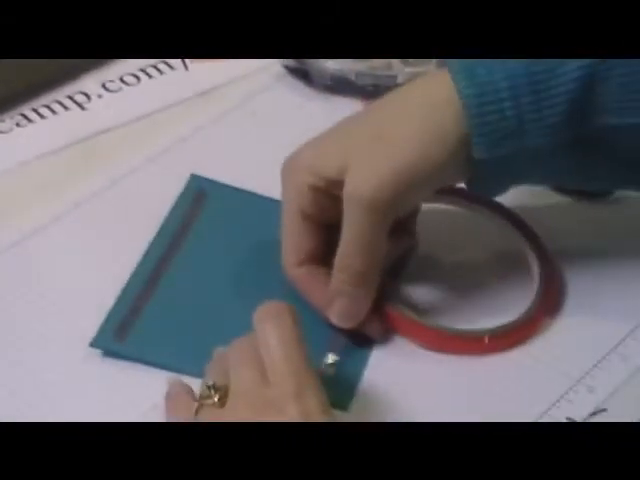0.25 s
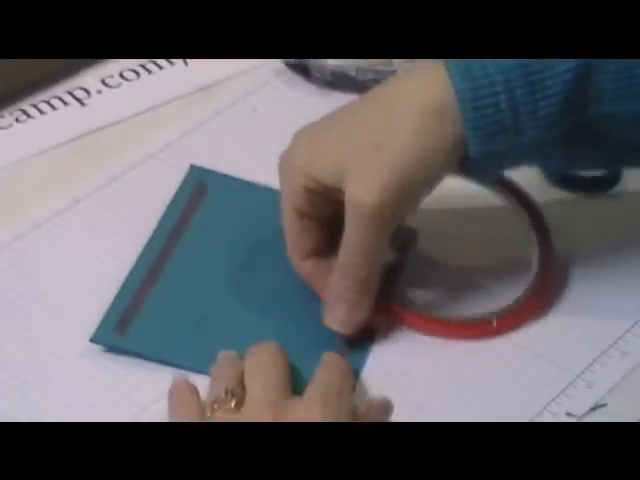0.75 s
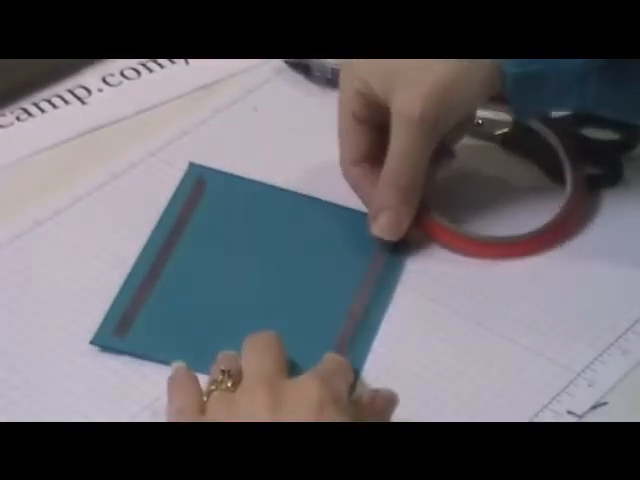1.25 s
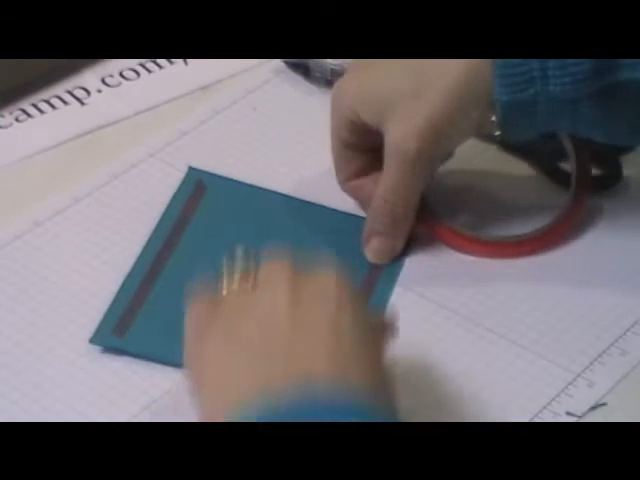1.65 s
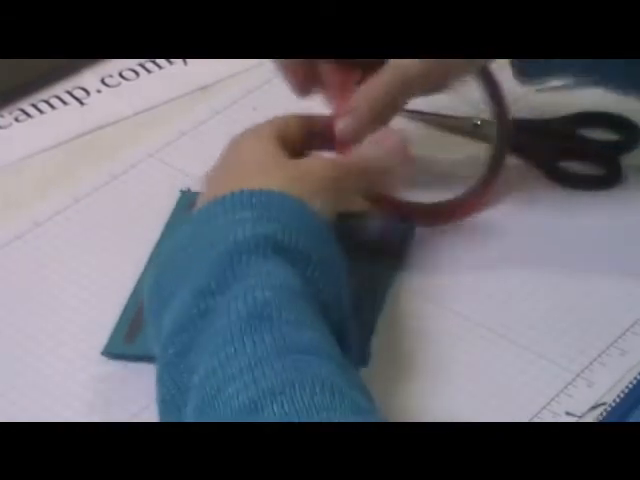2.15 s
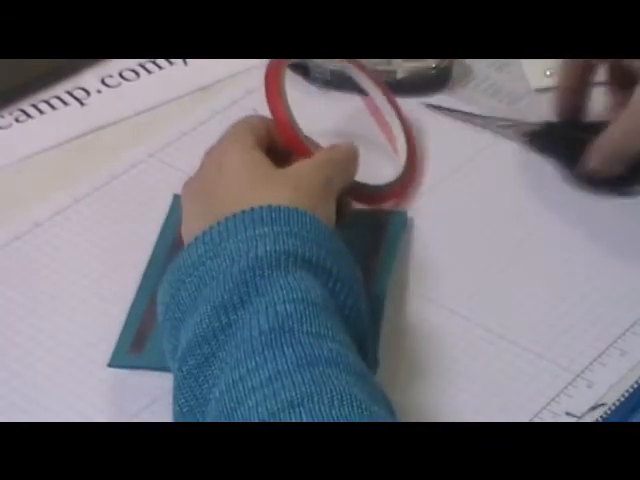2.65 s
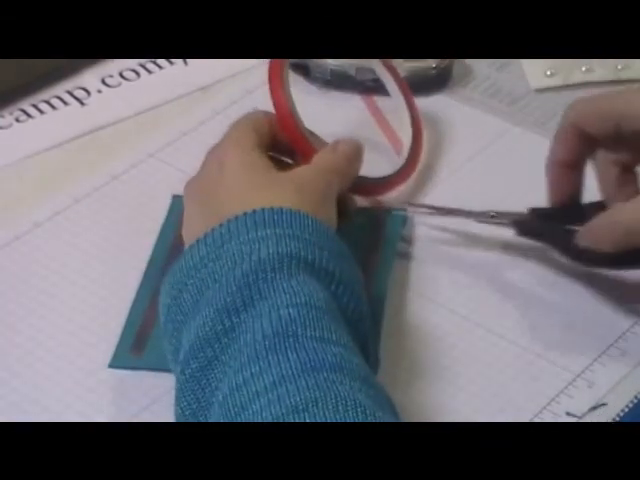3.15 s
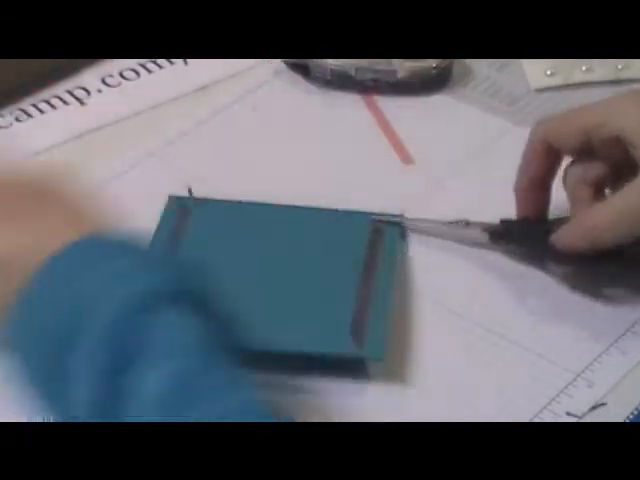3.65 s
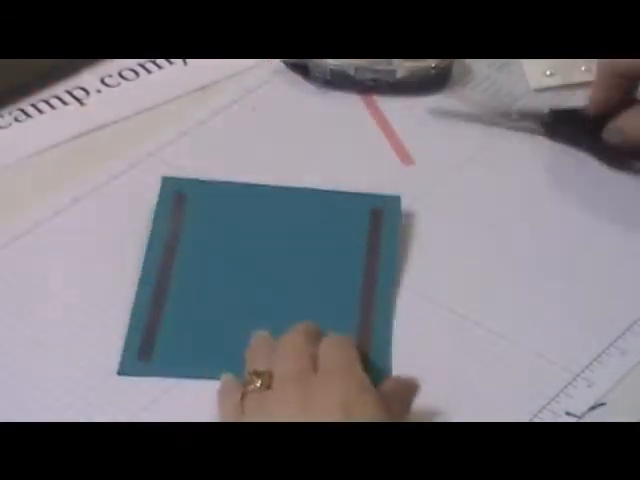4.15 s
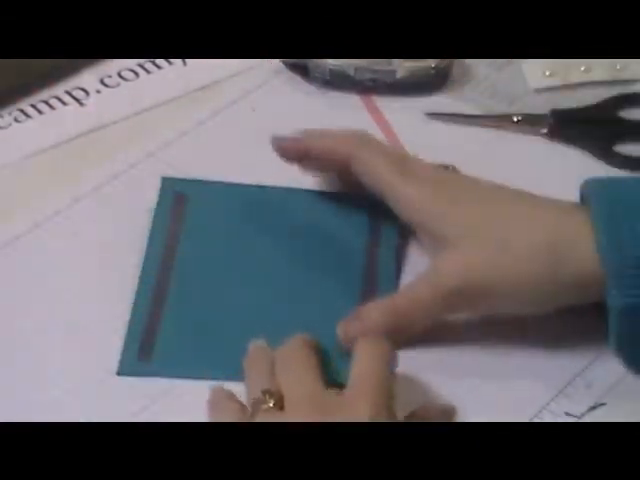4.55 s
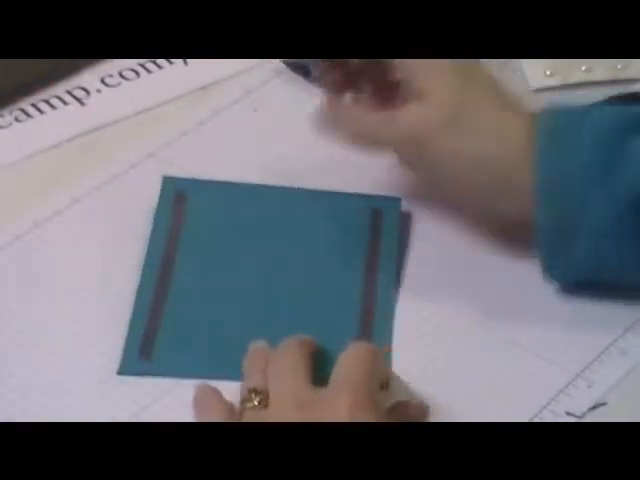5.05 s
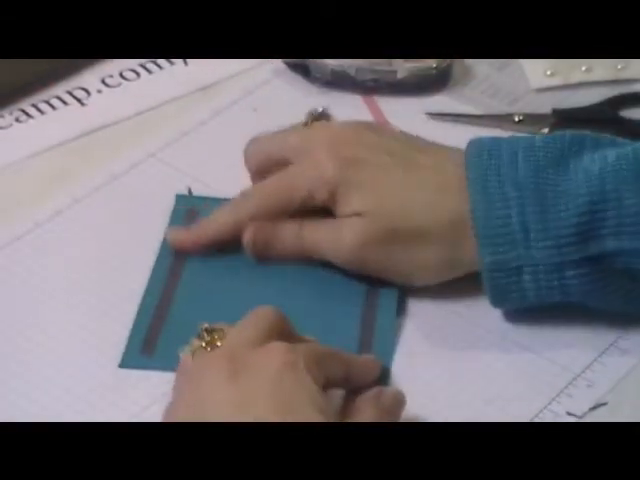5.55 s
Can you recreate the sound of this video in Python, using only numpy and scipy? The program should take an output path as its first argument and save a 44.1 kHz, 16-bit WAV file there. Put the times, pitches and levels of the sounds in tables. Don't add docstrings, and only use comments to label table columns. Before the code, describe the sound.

A tape roll knocks on a table, a strip briefly creaks, scissors snip and clatter down, then fingers rub card in a quiet room.

```python
import sys
import numpy as np
from scipy import signal
from scipy.fft import rfft, irfft
from scipy.io import wavfile
from scipy.ndimage import uniform_filter1d

SR = 44100
rng = np.random.default_rng(int(sys.argv[2]) if len(sys.argv) > 2 else 0)


def bounce(signal):
    frames = np.transpose(np.atleast_2d(signal))
    limited = np.clip(frames, -1, 1)
    pcm = np.round(limited * 32767).astype(np.int16)
    wavfile.write(sys.argv[1], SR, pcm)


def level_to_linear(level):
    exponent = np.asarray(level, float) / 20
    return 10 ** exponent


N = 255780
PORTS = np.array([[1], [-1]])


def at_hz(points, hz):
    points = np.array(points)
    return np.interp(np.log(hz), np.log(points[:, 0]), points[:, 1])


def rms_one(x):
    return x / np.sqrt(np.mean(x ** 2) + 1e-20)


def delayed(x, lag):
    return np.r_[np.zeros(lag), x[:N - lag]]


def drift(rate):
    r = np.exp(-80 * np.pi * rate / SR)
    slow = signal.lfilter([1], [1, -2 * r, r * r], rng.standard_normal(N // 40 + 2002))
    slow = slow[2000:]
    return np.interp(np.arange(N) / 40, np.arange(len(slow)), rms_one(slow))


def bands(likeness, size):
    edges_hz = np.geomspace(35, 14800, 23)
    white = rng.standard_normal((2, 2, size + 4000))
    for k, (low, high) in enumerate(zip(edges_hz, edges_hz[1:])):
        band_pass = signal.butter(2, [low, high], "band", fs=SR, output="sos")
        mid, side = signal.sosfilt(band_pass, white[k % 2])[:, 4000:]
        hz = np.sqrt(low * high)
        alike = np.clip(at_hz(likeness, hz), 0, 1)
        yield hz, np.sqrt(1 + alike) * mid + np.sqrt(1 - alike) * side * PORTS


def resonance(x, hz, width_hz):
    r, w = np.exp(-np.pi * width_hz / SR), 2 * np.pi * hz / SR
    return signal.lfilter([(1 - r * r) / 2, 0, (r * r - 1) / 2], [1, -2 * r * np.cos(w), r * r], x)


# delay/s, left level/dB, right level/dB
ECHOES = [(.0056, -11.5, -9), (.0091, -11.5, -17), (0.0144, -8.5, -9)]


def nearby(x):
    out = np.zeros((2, N))
    for delay_s, *port_db in ECHOES:
        out += level_to_linear(np.array(port_db))[:, None] * delayed(x, round(delay_s * SR))
    return out


# f/Hz, t60/s
ROOM_T60 = [(100, 0.58), (260, 0.55), (700, 0.55), (1840, 0.69), (4850, 0.4), (12000, 0.94)]
# f/Hz, level/dB
ROOM_GAIN = [(100, -11), (300, 1.56), (1000, -2), (2500, -4.5), (5000, 1.5), (12000, -9)]
# f/Hz, left-right likeness
ROOM_LIKENESS = [(100, 1), (400, 0.92), (1500, 0.51), (4000, 0.95), (12000, 0.98)]


def room(x):
    t = np.arange(SR) / SR
    swell = 1 - np.exp(-t / 0.00094)
    tail = np.zeros((2, SR))
    for hz, band in bands(ROOM_LIKENESS, size=SR):
        tail += level_to_linear(at_hz(ROOM_GAIN, hz) - 60 * t / at_hz(ROOM_T60, hz)) * band
    return signal.fftconvolve(x[None], tail * swell, axes=1)[:, :N]


# f/Hz, level/dB
FLOOR = [(32, -68), (55, -14), (87, -14), (128, -5.5), (147, -19), (181, -5.5), (1360, -18.5),
         (1710, -19.5), (2530, -25), (2840, -24.5), (13200, -36.5)]
# f/Hz, left-right likeness
FLOOR_LIKENESS = [(60, 0.46), (130, 0.11), (290, 0.044), (630, 0.053), (1370, 0.54), (3000, 0.69),
                  (6570, 1), (14400, 0.42)]


def room_air():
    air = sum(level_to_linear(at_hz(FLOOR, hz)) * band for hz, band in bands(FLOOR_LIKENESS, size=N))
    return level_to_linear(-64.5) * rms_one(air)


# f/Hz, level/dB rms
HUM = [(44, -77.5), (120, -76), (240, -89), (360, -81), (1679, -83)]


def hum():
    t, out = np.arange(N) / SR, np.zeros((2, N))
    for hz, level_db in HUM:
        phase = np.array([[0], [.6]]) * 2.9 * 44 / hz
        waver_db = 2.8 * drift(9.6) * (hz > 50)
        out += level_to_linear(level_db + 5.0 + waver_db) * np.sin(2 * np.pi * hz * t + phase)
    return out


def buzz():
    mains_hz, level_db, orders = 59.96, -93, range(30, 52)
    t, out = np.arange(N) / SR, np.zeros(N)
    for k, (size, turn) in zip(orders, rng.random((len(orders), 2))):
        out += level_to_linear(level_db + 10 * (size - k % 2)) * np.sin(2 * np.pi * (k * mains_hz * t + turn))
    return out


def whine():
    return level_to_linear(-91) * rms_one(resonance(rng.standard_normal(N), hz=11348, width_hz=60))


# t/s, hold/s, skin on card level/dB, paper slide level/dB, table drag level/dB
STROKES = [(0.0, 0.005, -74, -42, -39), (0.28, 0.053, -75, -71, -60.5), (0.452, 0.29, -75.5, -76.5, -89),
           (0.75, 0.06, -64, -63.5, -59.5), (0.938, 0.0073, -53, -58, -46), (1.036, 0.22, -61.5, -68, -61),
           (1.703, 0.049, -63, -52.5, -53.5), (1.852, 0.19, -59, -59.5, -54.5),
           (2.074, 0.15, -69.5, -62, -57), (2.314, 0.098, -64.5, -66, -64),
           (2.705, 0.029, -56.5, -52.5, -46), (3.377, 0.064, -74, -67, -57), (3.458, 0.015, -52, -53, -60),
           (3.555, 0.33, -66.5, -61.5, -62.5), (3.953, 0.043, -66, -63, -47),
           (4.058, 0.017, -66, -47.5, -51), (4.16, 0.083, -60.5, -72, -45), (4.26, 0.15, -83, -44, -43),
           (4.69, 0.055, -60, -64.5, -52), (4.864, 0.046, -54, -60, -56.5),
           (4.954, 0.0057, -53.5, -53.5, -49), (5.13, 0.14, -65.5, -63, -65),
           (5.503, 0.062, -51.5, -61, -51), (5.634, 0.21, -62, -62.5, -59)]


def strokes(t):
    rise_db_per_s = np.array([[173], [243], [205]])
    fall_db_per_s = np.array([[185], [95], [102]])
    shudder_db, shudder_fall_db_per_s = -5, 132
    steps = t[::64]
    power = np.zeros((4, len(steps)))
    for s, hold_s, *levels_db in STROKES:
        rising_db = rise_db_per_s * (s - steps).clip(0)
        falling_db = fall_db_per_s * (steps - s - hold_s).clip(0)
        power[:3] += level_to_linear(np.array(levels_db)[:, None] - rising_db - falling_db) ** 2
    for s, _, thud_db, *_ in PRESSES:
        falling_db = shudder_fall_db_per_s * (steps - s).clip(0)
        power[3] += (steps > s) * level_to_linear(thud_db + shudder_db - falling_db) ** 2
    return np.array([np.interp(t, steps, gain) for gain in np.sqrt(power)])


# f/Hz, level/dB per Hz
SKIN = [(2650, -11), (4500, -2), (5590, -6.5), (6510, -4), (7190, -0.5), (12600, -3), (16000, 15)]
# f/Hz, level/dB per Hz
PAPER = [(650, -58), (1100, -16), (2080, 3.5), (2540, -3), (3010, -3), (3470, -7.5), (6000, -15),
         (7800, -30), (13200, -120)]
# f/Hz, level/dB per Hz
RUMBLE = [(41, -65), (70, -25), (108, -10.5), (140, -9), (306, -1.5), (751, -7), (1020, -5), (1500, -13.5),
          (1950, -57), (3300, -120)]
# f/Hz, left-right likeness
RUB_LIKENESS = [(100, 0.88), (1000, 0.75), (4000, 0.99), (12000, 0.96)]
# t/s, length/s, skin level/dB, paper level/dB
SCUFFS = [(0.202, 0.085, -63.5, -75.5), (0.738, 0.094, -58, -79), (1.05, 0.07, -59, -59),
          (1.662, 0.055, -62, -52), (1.767, 0.068, -57.5, -58), (2.048, 0.14, -59, -64),
          (2.23, 0.065, -62, -73), (2.341, 0.027, -55.5, -92), (2.555, 0.12, -61.5, -50.5),
          (3.042, 0.018, -64.5, -92), (3.297, 0.048, -60.5, -76), (3.327, 0.042, -53.5, -59),
          (3.38, 0.04, -66, -72), (3.417, 0.016, -50.5, -57), (3.45, 0.008, -48, -65),
          (3.4575, 0.010, -53, -56), (3.565, 0.061, -52.5, -72), (3.719, 0.022, -44, -67),
          (3.734, 0.03, -56, -70), (3.951, 0.046, -54.5, -48.5), (4.153, 0.054, -60, -71),
          (4.22, 0.15, -50.5, -42), (4.701, 0.18, -54, -71), (4.92, 0.072, -47, -64),
          (5.291, 0.053, -62.5, -66), (5.41, 0.094, -74, -61), (5.481, 0.073, -50.5, -56),
          (5.555, 0.12, -56.5, -75), (5.77, 0.088, -43.5, -62)]


def rubs():
    t = np.arange(N) / SR
    gains = strokes(t)
    for start, length, *scuff_db in SCUFFS:
        corners = [0, 0.26 * length, 0.56 * length, length]
        shape = np.interp(t - start, corners, [0.00031, 0.87, 0.89, 0.0019])
        gains[:2] += level_to_linear(np.array(scuff_db))[:, None] * shape
    layers, grain = np.zeros((3, 2, N)), drift(42)
    for hz, band in bands(RUB_LIKENESS, size=N):
        band = band * level_to_linear(0.39 * grain + 1.68 * drift(16.0))
        for layer, spectrum in zip(layers, (SKIN, PAPER, RUMBLE)):
            if spectrum[0][0] < hz < spectrum[-1][0]:
                layer += level_to_linear(at_hz(spectrum, hz)) * band
    catches = 28.0 * (rng.random(N) < 90 / SR)
    layers[1] *= 1 + 1.1 * uniform_filter1d(catches, size=40)
    dull = signal.sosfilt(signal.butter(4, 764, fs=SR, output="sos"), layers[2, :, ::-1])
    return sum(gain * rms_one(layer) for gain, layer in zip(gains, [*layers, dull]))


# t/s, hollow knock level/dB, hard rim level/dB, table thud level/dB, hardness/dB per octave
ROLL = [(0.0062, -27.5, -28, -33.5, 3.5), (0.026, -32, -49, -58, -2), (0.053, -38, -59, -39, 14),
        (0.101, -51, -57, -74, 3), (0.468, -54.5, -56, -78, 2), (0.774, -50.5, -65, -58, -7),
        (0.884, -28.5, -27.5, -29, -3.5), (0.9035, -30.5, -43, -42.5, 10), (0.945, -25.5, -35, -35, 3),
        (0.981, -56, -42, -39, -9.5), (1.17, -45, -57, -69, -10), (1.458, -55.5, -69, -60, -5),
        (1.934, -41, -45, -53, 9), (2.065, -42, -62, -44, -2), (2.134, -43, -50, -49, -5),
        (2.165, -41.5, -51, -59, -2), (2.314, -35, -45.5, -40, -0.5), (2.348, -46, -55, -47.5, -5)]
SCISSORS = [(2.564, -28, -36, -34, 2.5), (2.578, -25, -28, -31.5, 9), (2.588, -26.5, -32.5, -30, 0),
            (2.639, -46, -54, -33, -4), (2.693, -34, -41, -29.5, -5.5), (2.707, -42, -52, -38, -1),
            (2.738, -40, -34.5, -34.5, 7), (2.754, -36, -42, -40, 6), (2.795, -45, -57, -46, -3),
            (2.864, -55, -55, -63, 6), (2.908, -56.5, -60, -61, -3), (3.298, -57, -72, -58.5, -9),
            (3.494, -62, -61, -55, -2), (3.609, -54, -52, -54.5, -15), (3.96, -31.5, -41, -36.5, 9),
            (3.972, -36.5, -62, -42, 2), (4.045, -37, -62, -39, 2), (4.062, -29, -34, -39, 3.5),
            (4.082, -43, -56, -56, -4), (4.222, -20.5, -19, -37, 7.5), (4.228, -28, -28, -32.5, 9),
            (4.241, -21, -19, -33, 15.5), (4.26, -26, -36, -28, 3), (4.273, -21, -50, -25, -12.5),
            (4.298, -23.5, -46, -37, 13), (4.32, -42, -49, -30, -4), (4.352, -42, -29.5, -32, 3),
            (4.375, -19.5, -24, -29, 7.5), (4.392, -23, -26, -27.5, 0), (4.454, -38, -33, -35, 1)]
# t/s, hollow knock level/dB, table thud level/dB, deep thump level/dB, hardness/dB per octave
PRESSES = [(0.681, -56, -68, -63, -6), (1.534, -47.5, -57, -46, -4), (1.544, -50, -44, -53, 5),
           (1.576, -53, -44.5, -48, -4), (1.740, -37, -45, -52, 0), (1.798, -67, -47, -57, -11),
           (1.906, -83, -63, -50, 1), (2.606, -35, -40, -37.5, 5.5), (3.463, -42.5, -47.5, -49, -9.5),
           (3.802, -31, -32, -32, 6.5), (4.759, -53.5, -50.5, -49.5, -19.5),
           (4.961, -46.5, -44, -39, -15.5), (4.977, -62, -62, -46, -1), (5.069, -68, -73, -62, -8),
           (5.167, -50, -54.5, -77, 7), (5.291, -52, -57, -57, 15), (5.399, -55, -56.5, -58, -10),
           (5.511, -56, -43, -35.5, -11), (5.526, -58, -44, -44, -9), (5.559, -51, -42.5, -45, -14.5),
           (5.638, -69, -52, -58, -8), (5.691, -63, -55, -67, -18), (5.788, -52, -53, -38.5, -12)]


def contacts():
    rows = []
    for table, thump_db, ring_db in ((ROLL, -27.5, 1.53), (SCISSORS, -17, 1.2)):
        for s, knock_db, rim_db, thud_db, hardness in table:
            rows.append((s, knock_db, rim_db, thud_db, thud_db + thump_db, ring_db, hardness))
    for s, knock_db, thud_db, deep_db, hardness in PRESSES:
        rows.append((s, knock_db, knock_db - 5.5, thud_db, deep_db, 4.5, hardness))
    return np.array(sorted(rows))


def strike(body, levels_db, scatter_db):
    rows, out = contacts(), np.zeros(N)
    at = (rows[:, 0] * SR).astype(int)
    lowest_hz, highest_hz = body[0][0], body[-1][0]
    middle_hz = np.sqrt(lowest_hz * highest_hz)
    luck = rng.standard_normal((len(at), 2, len(body)))
    for k, (hz, level_db, t60) in enumerate(body):
        tilt_db = rows[:, 6] * np.log2(hz / middle_hz)
        clicks = np.full(N, 1e-18)
        clicks[at] = level_to_linear(levels_db + level_db + scatter_db * luck[:, 0, k] + tilt_db) * np.sign(luck[:, 1, k])
        r, w = level_to_linear(-60 / (t60 * SR)), 2 * np.pi * hz / SR
        out += signal.lfilter([0, np.sin(w)], [1, -2 * r * np.cos(w), r * r], clicks)
    span = signal.butter(2, [0.77 * lowest_hz, 1.11 * highest_hz], "band", fs=SR, output="sos")
    return signal.sosfilt(span, out)


# f/Hz, level/dB, t60/s
OBJECTS = [(632, 2, 0.034), (714, -13.5, 0.071), (814, -1, 0.047), (942, -2, 0.051), (1050, -0.5, 0.029),
           (1161, -0.5, 0.022)]
# f/Hz, level/dB, t60/s
RIMS = [(1346, 2.5, 0.022), (1730, 4.5, 0.0088), (1710, 3.5, 0.019), (1940, 0.5, 0.02),
        (2050, -13.5, 0.017), (2910, 3.5, 0.0025), (3300, -1, 0.0037)]
# f/Hz, level/dB, t60/s
TABLE = [(217.3, -4.5, 0.074), (260.5, -10.5, 0.12), (291.6, 1.5, 0.049), (331.7, -0.5, 0.097),
         (389, 0.5, 0.047), (451.6, 2, 0.057), (582, -10, 0.022)]
# f/Hz, level/dB, t60/s
LEGS = [(105, 2.5, 0.046), (124.8, -2.5, 0.24), (168.8, 3, 0.14)]


def knocks():
    s, knock_db, rim_db, thud_db, deep_db, ring_db, _ = contacts().T
    low = strike(TABLE, thud_db - 6.5, scatter_db=3.0) + strike(LEGS, deep_db - 8.0, scatter_db=4.5)
    hollow = strike(OBJECTS, knock_db - 6, scatter_db=2.0)
    hard = strike(RIMS, rim_db - 7.5, scatter_db=4.0)
    close = hollow + hard + low
    latest = np.searchsorted(s, np.arange(N) / SR + .001).clip(1) - 1
    ringing = close * level_to_linear(ring_db[latest])
    uneven = level_to_linear(-27) * delayed(low, round(0.0049 * SR)) * PORTS
    return close + uneven + nearby(ringing) + level_to_linear(-34.0) * room(ringing)


# t/s, peak level/dB, f/Hz, cycles
FLICKS = [(0.0062, -15, 3020, 13.5), (0.0078, -19, 1090, 14), (0.012, -31, 525, 29), (0.036, -32, 620, 21),
          (0.0523, -31, 4300, 15), (0.682, -52, 900, 8), (0.9145, -23, 905, 9.7), (0.957, -25.5, 600, 6),
          (0.982, -43, 4100, 18), (0.982, -24, 1510, 9.2), (0.988, -36, 330, 12), (1.535, -35, 800, 18),
          (1.535, -43, 4180, 17), (1.56, -47, 2970, 13), (1.688, -33, 3000, 43), (1.7411, -31, 1100, 4),
          (1.7994, -36, 2050, 13), (1.8612, -36.5, 4600, 18), (1.9026, -44, 2050, 19),
          (2.578, -21, 1100, 4), (2.588, -26.5, 928, 62), (2.693, -22.5, 704, 6), (2.7066, -20.5, 250, 2.5),
          (2.733, -31, 330, 22), (2.79, -35, 273, 24), (3.464, -33.5, 590, 7.5), (3.61, -30, 2020, 14),
          (3.8017, -25.5, 1260, 19), (3.802, -31, 415, 10), (3.964, -30, 1050, 42), (4.0258, -33, 1800, 18),
          (4.061, -19.5, 3060, 10), (4.2221, -15, 1180, 17), (4.228, -18, 1910, 34), (4.241, -12, 4380, 13),
          (4.259, -11.5, 1220, 12), (4.268, -23.5, 642, 24), (4.298, -14.5, 1050, 16),
          (4.318, -24.5, 317, 14), (4.375, -17.5, 1070, 16), (4.388, -26, 287, 27), (4.966, -35.5, 428, 12),
          (5.168, -36.5, 810, 5.5), (5.302, -47.5, 202, 28), (5.55, -32.5, 191, 20),
          (5.654, -40.5, 200, 17),
          (0.8838, -22, 4300, 9), (0.8840, -29, 7900, 14), (0.8838, -20, 1100, 6), (0.9456, -25, 1150, 12),
         (3.4621, -23, 8700, 12), (3.4622, -28, 6500, 10), (3.4621, -21, 4400, 7), (3.4622, -23, 1900, 5),
         (3.6097, -28, 4000, 13), (4.0465, -35, 3800, 12), (4.081, -36, 2800, 10), (4.2223, -28, 6600, 20),
         (4.2223, -33, 12500, 30), (4.244, -22, 1950, 18), (4.706, -47, 1400, 90), (3.803, -33, 148, 36)]
# t/s, peak level/dB, first f/Hz, time to a quarter of f/s
SWEEPS = [
    (3.4626, -34, 2400, .0022),
    (3.4985, -41, 2200, .010),
    (3.6105, -42, 2000, .007),
]


def flicks():
    out, t = np.zeros(N + 6000), np.arange(6000) / SR
    for s, db, hz, cycles in FLICKS:
        start = round(s * SR)
        out[start:start + 6000] -= level_to_linear(db - 60 * t * hz / cycles) * np.sin(2 * np.pi * hz * t)
    for s, db, hz, span in SWEEPS:
        start = round(s * SR)
        fall = level_to_linear(db - 9 * t / span)
        out[start:start + 6000] += fall * np.sin(2 * np.pi * hz * span * t / (t + span))
    return signal.sosfilt(signal.butter(4, 120, "high", fs=SR, output="sos"), out[:N])


# t/s, bright level/dB, duller level/dB
SNAPS = [(0.0529, -31, -24), (0.295, -49, -66), (0.361, -49, -64), (0.47, -53, -49), (0.68, -50, -51),
         (0.8836, -23.5, -20.5), (1.561, -35.5, -43), (1.634, -45, -60), (1.688, -59, -36),
         (1.8616, -32.5, -54), (1.9024, -59, -59), (2.3625, -35.5, -58), (3.4526, -26, -55),
         (3.4844, -45, -54), (3.5457, -48, -61), (3.4986, -40, -42), (4.5595, -37, -62), (3.6096, -40, -32),
         (4.0259, -35, -34), (4.1769, -39, -54), (4.299, -34, -36), (5.167, -46, -37),
         (5.291, -39.5, -35.5), (5.4928, -42, -53)]
# t/s, bright level/dB, duller level/dB
CLACKS = [(0.006, -45, -24), (0.1, -45, -57), (0.8805, -43, -44), (0.904, -36, -45), (0.9809, -33.5, -30),
          (1.5353, -33, -50), (1.545, -46, -52), (1.74, -58, -32.5), (1.799, -49, -32.5),
          (2.5641, -46, -37), (2.578, -54, -34), (2.589, -51, -36), (3.046, -48, -68), (3.801, -55, -45),
          (4.044, -39, -40), (4.0596, -51, -31), (4.2223, -52, -17.5), (4.2404, -42, -20.5),
          (4.255, -22.5, -33), (4.375, -45, -41), (4.9613, -29.5, -37), (5.0853, -34, -38),
          (5.4160, -47, -42.5)]
# f/Hz, width/Hz, level/dB
BRIGHT = [(6640, 620, -7.5), (8100, 2040, 0.5), (10470, 1200, 0), (12500, 1100, -3)]
# f/Hz, width/Hz, level/dB
DULLER = [(2140, 650, 5.5), (3010, 340, 7.5), (3920, 620, 5), (5530, 1460, -1.5)]


def ticks():
    shapes, t = np.zeros((2, N + 2000)), np.arange(2000) / SR
    for table, decay_ms in ((SNAPS, 1.3), (CLACKS, 2.37)):
        fall = np.exp(-1000 * t / decay_ms)
        fall[:3] *= level_to_linear(4.5)
        for s, bright_db, duller_db in table:
            start = round(s * SR)
            shapes[:, start:start + 2000] += level_to_linear(np.array([[bright_db - 2], [duller_db - 3]])) * fall
    mid, side = rng.standard_normal((2, N))
    noise = mid + level_to_linear(-18.5) * side * PORTS
    bright, duller = np.zeros((2, 2, N))
    for out, shape, body in ((bright, shapes[0], BRIGHT), (duller, shapes[1], DULLER)):
        burst = shape[:N] * noise + 1e-18
        for hz, width_hz, db in body:
            out += level_to_linear(db) * resonance(burst, hz, max(width_hz, hz / 8))
    duller = duller + flicks() * (1 + level_to_linear(-23) * PORTS)
    far = np.ones(N)
    far[round(3.4 * SR):round(3.75 * SR)] = level_to_linear(-5)
    to_room = far * (level_to_linear(-39.5) * bright[0] + level_to_linear(-39) * duller[0])
    return bright + duller + level_to_linear(-11.0) * nearby(duller[0]) + room(to_room)


def peel():
    start_s, length_s, hz, width_hz = 1.665, .055, 3000, 500
    shape = np.interp(np.arange(N) / SR - start_s, [0, 0.57 * length_s, length_s], [0, 1, 0])
    creak = resonance(resonance(rng.standard_normal(N), hz, width_hz), hz, width_hz)
    return level_to_linear(-47.5) * shape * rms_one(creak) * level_to_linear(2.0 * drift(150))


def scene():
    handling = knocks() + ticks() + rubs()
    steady = room_air() + hum()
    return handling + steady + peel() + whine() + buzz()


def band_limit(x):
    return signal.sosfilt(signal.butter(12, 14970, fs=SR, output="sos"), x)


# f/Hz, width/Hz, depth 0-1
DIPS = [(2535, 81, 1), (5640, 500, .35), (5722, 170, 1), (7228, 270, 1)]
# from t/s, to t/s, top f/Hz
OPENINGS = [(0.06, 0.12, 13100), (0.35, 0.4, 13250), (0.5, 0.6, 13250), (0.6, 0.87, 13750),
            (0.88, 1.04, 13250), (1.04, 1.1, 14250), (1.1, 1.29, 13750), (1.54, 1.58, 13750),
            (1.63, 1.76, 13250), (1.85, 2.0, 13250), (2.0, 2.08, 13750), (2.21, 2.29, 13750),
            (2.3, 2.33, 14250), (2.34, 2.39, 14250), (2.5, 2.57, 13750), (2.57, 2.64, 13250),
            (3.02, 3.07, 13750), (3.29, 3.37, 15150), (3.41, 3.47, 14250), (3.55, 3.62, 13750),
            (4.21, 4.27, 13750), (4.65, 4.83, 13750), (4.83, 4.98, 13250), (5.2, 5.3, 13250),
            (5.42, 5.5, 14250), (5.5, 5.63, 13750), (5.63, 5.72, 13250), (5.72, 5.8, 14250)]


def record(dry):
    usual_top_hz, limit = 12980, .4
    x = dry * level_to_linear(np.array([[-.25], [.25]]))
    for dip_hz, width_hz, depth in DIPS:
        x = x - depth * resonance(x, dip_hz, width_hz)
    x = limit * np.tanh(x / limit)
    hz, spectrum = np.fft.rfftfreq(N, 1 / SR), rfft(x)

    def part(low, high):
        return irfft(spectrum * (low <= hz) * (hz < high), N)

    top = np.full(N, usual_top_hz)
    for start, end, top_hz in OPENINGS:
        top[round(start * SR):round(end * SR)] = top_hz
    steps = np.unique(top)
    out = part(0, usual_top_hz)
    for low, high in zip(steps, steps[1:]):
        is_open = uniform_filter1d(1. * (top >= high), size=600)
        out = out + level_to_linear(-4) * is_open * part(low, high)
    return band_limit(out)


dry = scene()
out = record(dry)
bounce(out)
```